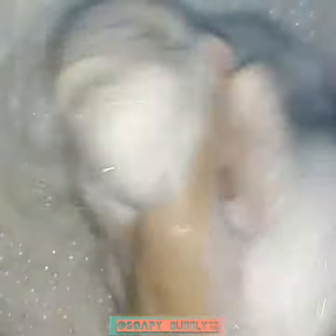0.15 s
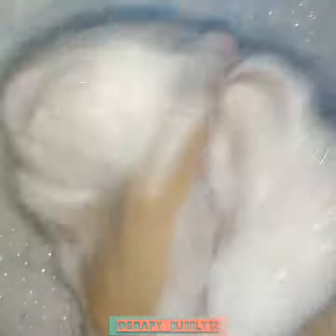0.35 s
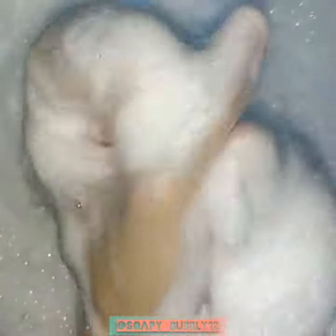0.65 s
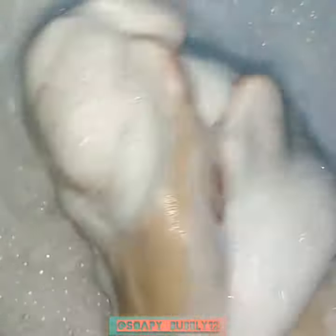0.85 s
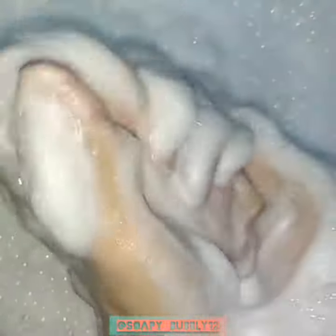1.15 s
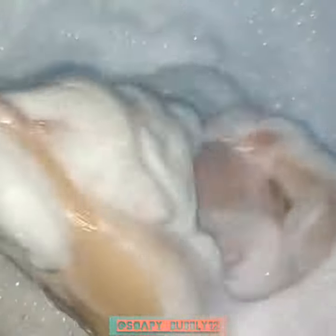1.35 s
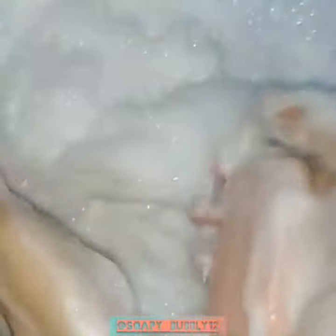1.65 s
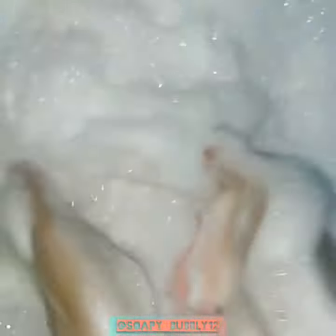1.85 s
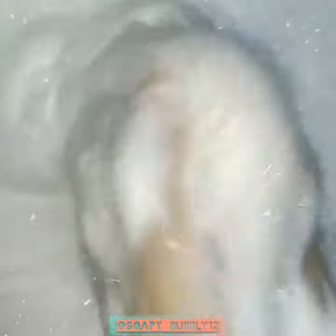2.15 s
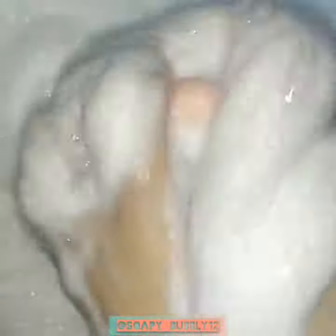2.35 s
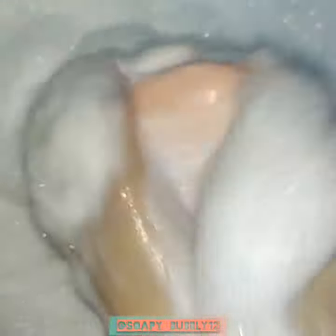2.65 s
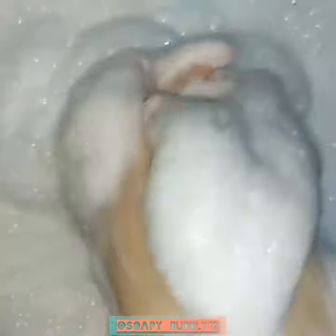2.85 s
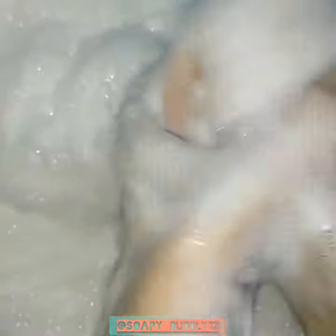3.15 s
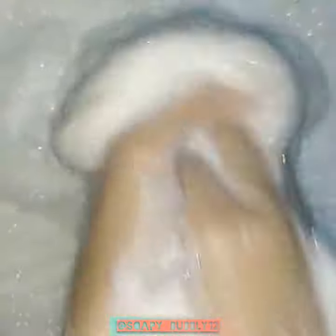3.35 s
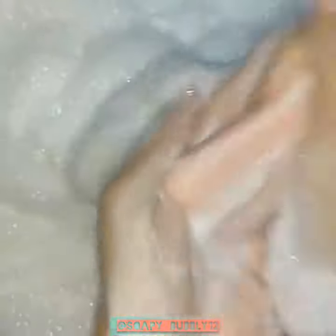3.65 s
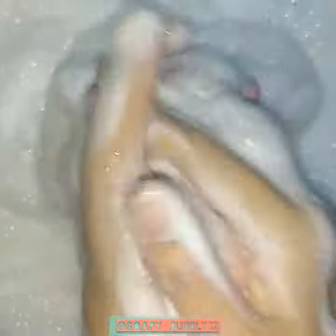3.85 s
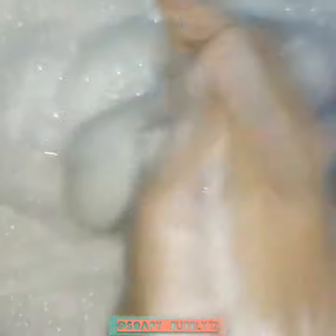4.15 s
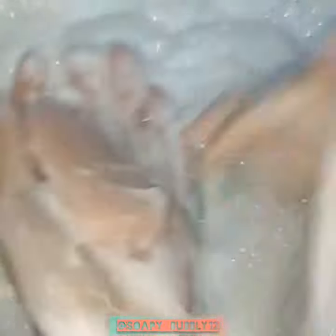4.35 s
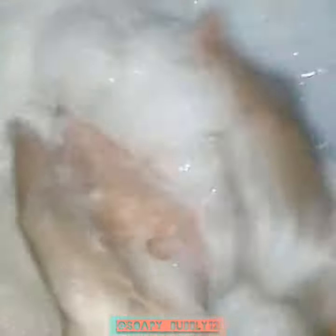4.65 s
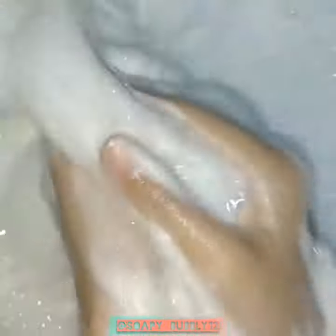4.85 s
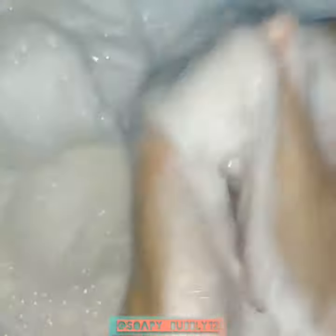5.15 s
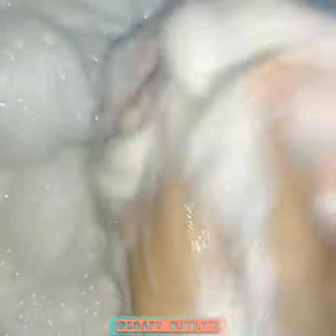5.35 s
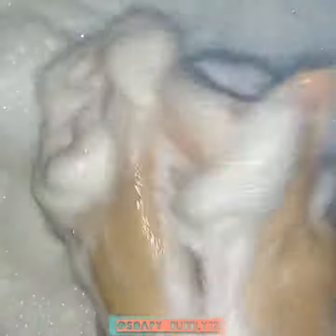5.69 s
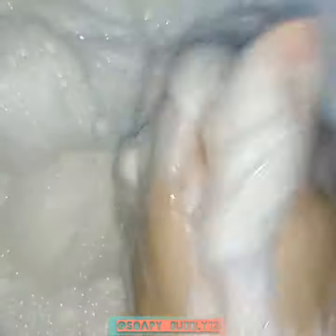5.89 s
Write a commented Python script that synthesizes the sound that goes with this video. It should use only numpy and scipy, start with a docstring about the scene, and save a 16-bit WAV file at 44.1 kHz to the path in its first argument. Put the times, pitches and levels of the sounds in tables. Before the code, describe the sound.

Close, wet squelching comes in uneven pulses as a soapy sponge is squeezed by hand, with air pockets popping and lather crackling and fizzing. It starts moderately, eases off, then returns stronger in the second half. Knuckles softly bump the basin a few times. The sound leans right, in a small room with a faint hum, and briefly cuts out here and there.

```python
"""Wet squelches and pops, close on the right: two hands knead a lathered sponge over a basin.
Air pockets ring as damped resonators, the smaller the higher, so large ones squelch and fine foam fizzes.
Soap films snap, crack and tear; knuckles excite the basin's modes; basin and walls add a short echo.
Behind it the foam hisses and the room hums low. The left microphone port hears the hands later and softer.
Each channel drops out at its own listed times, then recovers within 1 to 43 ms."""
import sys
import numpy as np
from scipy import signal
from scipy.io import wavfile

SR = 44100
rng = np.random.default_rng(int(sys.argv[2]) if len(sys.argv) > 2 else 0)


def to_wav(s):
    """Save 16-bit WAV."""
    ch = np.atleast_2d(s).T  # columns
    pcm = np.round(np.clip(ch, -1, 1) * 32767)  # PCM
    wavfile.write(sys.argv[1], SR, pcm.astype(np.int16))


N = 265482

# The hands' steady pressure. Each row: time in seconds, relative level in dB.
PRESSURE = [(0, -75), (.1, -88), (.25, -44), (.5, -71), (.75, -40.5), (1.05, -64), (1.2, -73), (1.4, -56),
            (1.75, -48.5), (2.2, -44), (2.55, -50), (3.0, -54.5), (3.3, -41), (3.8, -43), (4.2, -37.5),
            (4.45, -71), (4.8, -63), (5.1, -40.5), (5.3, -53), (6.02, -53)]
# Squeezes of the sponge. Each row: time of full strength and hold in seconds, then the levels
# of squelch, crackle and fizz in dB.
SQUEEZES = [(0.021, 0.0095, -36.5, -61, -50), (0.188, 0.061, -43.5, -55, -42.5),
            (0.321, 0.022, -40.5, -53.5, -70), (.412, .01, -60, -71, -58), (0.591, 0.0033, -36, -32, -56),
            (.63, 0.073, -51, -69, -69), (.918, 0.013, -60, -56, -46), (1.045, .03, -76, -77, -66),
            (1.11, 0.0088, -45, -61, -43.5), (1.247, 0.0048, -45.5, -68, -53),
            (1.362, 0.036, -46.5, -47.5, -46), (1.496, 0.056, -47, -44, -45), (1.549, 0.037, -45, -45, -37),
            (1.695, 0.047, -40, -49, -55), (1.771, 0.0074, -34, -44, -48), (1.922, 0.0097, -39, -54, -44),
            (1.992, 0.011, -39, -63, -43.5), (2.12, 0.056, -38, -50, -40.5),
            (2.29, 0.0056, -43.5, -48, -58), (2.359, 0.049, -38, -45, -58), (2.93, 0.018, -48, -55, -51),
            (3.082, 0.044, -55, -46, -41), (3.206, 0.014, -25.5, -27, -24.5),
            (3.427, 0.019, -30.5, -61, -36), (3.49, 0.022, -31.5, -47, -34),
            (3.612, 0.013, -51, -48.5, -43), (3.683, 0.011, -38, -37, -34), (3.72, 0.14, -43.5, -44, -39),
            (3.818, 0.035, -38, -38, -37), (4.076, 0.039, -42, -30, -26.5),
            (4.236, 0.021, -28, -35.5, -22.5), (4.517, 0.022, -40.5, -42, -44),
            (4.693, 0.004, -32, -36.5, -31), (5.089, 0.016, -55, -43, -44),
            (5.186, 0.03, -44, -40.5, -36.5), (5.341, 0.035, -48, -43.5, -45),
            (5.395, 0.047, -38.5, -44, -45.5), (5.562, 0.0069, -39, -44, -37),
            (5.726, 0.0052, -36.5, -45, -62), (5.843, 0.073, -45.5, -49.5, -54),
            (5.981, .04, -44, -47, -39)]
# Each list gives squelch, crackle, fizz.
GRIP_DB_PER_S = [1100, 1200, 1198]
RELEASE_DB_PER_S = [296, 283, 222]
STEADY_DB, PRESSURE_SHARE = [-54.5, -60.5, -50.5], [0.63, 0.84, 0.14]

def kneading():
    """Gains of squelch, crackle and fizz: steady pressure and exponential squeezes add in power."""
    t = np.arange(0, N + 64, 64) / SR
    pressure = np.interp(t, *np.transpose(PRESSURE))
    full, held, *peaks_db = np.transpose(SQUEEZES)
    since, gains = t - full[:, None], []
    for k, db in enumerate(peaks_db):
        release_db = RELEASE_DB_PER_S[k] * np.maximum(since - held[:, None], 0)
        loss_db = np.maximum(-GRIP_DB_PER_S[k] * since, release_db)
        steady = from_db(STEADY_DB[k] + PRESSURE_SHARE[k] * (pressure - pressure.mean()))
        gain = np.sqrt(steady ** 2 + np.sum(from_db(db[:, None] - loss_db) ** 2, axis=0))
        gains.append(np.interp(np.arange(N) / SR, t, gain))
    return gains

# Spectra of large, middling and fine bubbles. Each row: frequency in Hz, relative level in dB.
SQUELCH = [(230, -26.5), (290, 3), (370, 4.5), (490, -10.5), (620, -3.5), (800, 2.5), (1000, 0.5),
           (1200, -19.5)]
CRACKLE = [(1100, -15), (1500, 4), (2000, 1.5), (2600, 4), (3300, -5), (4300, -34)]
SQUEEZED_FIZZ = [(3000, -0.5), (4500, 0), (6500, -4), (9000, 4.5), (12000, 5), (15500, -4)]
HARD_SQUEEZE_DB, WET_HZ = -33, 6000   # water's muffling of the fizz is complete at this level

def lather():
    """Bubble resonance rises as size falls: large pockets squelch, middling ones crackle, fine fizz."""
    squelch_gain, crackle_gain, fizz_gain = kneading()
    squelch = bubbles(900, SQUELCH, cycles=5.0, spread_db=1.94, clump_db=4.5, patchy_db=2.0)
    crackle = bubbles(1200, CRACKLE, cycles=6.3, spread_db=1.42, clump_db=7.0, patchy_db=3.0)
    fizz = bubbles(6000, SQUEEZED_FIZZ, cycles=5.8, spread_db=1.2, clump_db=5.5, patchy_db=3.0)
    wet = np.minimum(fizz_gain / from_db(HARD_SQUEEZE_DB), 1)
    fizz = (1 - wet) * fizz + wet * butterworth(fizz, 1, WET_HZ)
    return (both_ports(squelch_gain * soften(squelch, top_hz=1470), left_db=-8.5, shadow_hz=3000)
            + both_ports(crackle_gain * crackle, left_db=-15.5, shadow_hz=3000)
            + both_ports(fizz_gain * fizz, left_db=-33, shadow_hz=9000))

def bubbles(per_s, spectrum, cycles, spread_db, clump_db, patchy_db, count=14):
    """Shot noise: clumped random impulses ring resonators that fall 60 dB in `cycles`; unit power."""
    sizes = from_db(spread_db * np.minimum(rng.exponential(1, N), 4)) * rng.choice([-1, 1], N)
    chance = rng.random(N)
    clumping = from_db(clump_db * (.7 * drift(15) + .7 * drift(90)))
    born = chance < per_s * clumping / SR
    resonator = rng.integers(0, count, N)
    out = 0
    for k, hz in enumerate(np.geomspace(spectrum[0][0], spectrum[-1][0], count)):
        patches = from_db(at_hz(spectrum, hz) + patchy_db * drift(14.8))
        out = out + hz * ring(patches * sizes * born * (resonator == k), hz, cycles / hz)
    return unit_power(out)

def bursts(rows, cycles, left_db, rise, spray_db, spray_cycles, spray_stretch, lead_s=0, size=2048):
    """Damped oscillation: each pocket rings with a noisy spray, its pitch climbing as it empties."""
    out, t = np.zeros((2, N + 2 * size)), np.arange(size) / SR
    for (start, db, hz), noise in zip(rows, rng.standard_normal((len(rows), size + 2))):
        ring_cycles = cycles * np.exp(.25 * noise[-1])   # uneven from burst to burst
        turns = hz * t
        swell = np.minimum(turns / 0.47, 1)   # the wall opens within the first cycle
        tone = np.sin(2 * np.pi * turns * (1 + rise * turns)) * from_db(-60 * turns / ring_cycles)
        spray = unit_power(ring(noise[:size], hz, spray_cycles / hz))
        spray *= from_db(spray_db - 60 * turns / (spray_stretch * ring_cycles))
        sound = from_db(db) * soften(swell * (tone + spray), top_hz=min(3.6 * hz, 18000))
        deep_db = -7 * max(np.log2(700 / hz), 0)   # deep pockets are fainter on the left
        at = round((start - lead_s) * SR)
        left_at = at + LEFT_LAG_SAMPLES
        out[1, at:at + size] += sound
        out[0, left_at:left_at + size] += from_db(left_db + deep_db + 0.47 * noise[-2]) * sound
    return out[:, :N]

# Air pockets bursting in the sponge. Each row: time in seconds, level in dB, pitch in Hz.
POPS = [(.2103, -26.5, 500), (.2959, -20.5, 730), (.3161, -20.5, 430), (.4098, -10, 633), (.4385, -21, 432),
        (.5976, -17.5, 430), (.616, -20, 700), (.6256, -9, 602), (1.0862, -30, 1020), (1.122, -38, 760),
        (1.3202, -23.5, 700), (1.4921, -15, 870), (1.6938, -21, 865), (1.7083, -18, 804),
        (1.7414, -23, 1010), (1.7738, -24.5, 820), (1.9218, -12, 433), (1.9937, -19.5, 1020),
        (2.0669, -24.5, 447), (2.1062, -23, 660), (2.1368, -21.5, 410), (2.2952, -23.5, 680),
        (2.3605, -25, 470), (2.3763, -20, 626), (2.549, -34, 680), (2.6149, -39, 705), (2.6976, -27, 395),
        (3.1028, -31, 756), (3.2045, -13, 440), (3.2085, -16, 500), (3.2125, -11.5, 500),
        (3.2165, -12, 533), (3.2224, -7.5, 443), (3.2325, -28, 520), (3.2395, -21, 580), (3.2487, -12, 426),
        (3.2545, -18, 610), (3.2608, -16, 585), (3.2705, -17, 634), (3.3227, -14.5, 647),
        (3.3944, -10, 734), (3.4133, -17, 734), (3.43, -16, 1150), (3.4385, -14, 1250), (3.463, -19, 760),
        (3.47, -21, 700), (.64, -26, 660), (.655, -28, 650), (3.428, -4.5, 560), (3.4321, -16, 406),
        (3.4348, -7, 360), (3.4375, -8, 434), (3.44, -3.5, 780), (3.449, -7, 750), (3.4565, -15, 414),
        (3.4815, -22, 500), (3.5027, -6, 830), (3.6312, -14.5, 1270), (3.673, -20.5, 700),
        (3.8695, -13, 493), (3.9218, -16, 640), (4.0121, -22.5, 820), (4.0685, -24.5, 700),
        (4.0775, -24.5, 624), (4.0904, -19.5, 620), (4.129, -16, 680), (4.143, -23, 700), (4.162, -25, 680),
        (4.208, -38, 620), (4.2399, -10.5, 500), (4.2447, -10.5, 613), (4.2562, -12.5, 442),
        (4.2635, -11, 1000), (4.5195, -29, 690), (4.5482, -22, 760), (4.7033, -26, 965),
        (4.7794, -24.5, 780), (4.7965, -24.5, 540), (4.841, -27, 790), (4.8636, -9, 910),
        (4.9856, -26, 610), (5.1922, -28, 910), (5.2221, -19, 910), (5.2225, -21.5, 380),
        (5.3656, -20.5, 644), (5.4007, -20.5, 760), (5.402, -24, 393), (5.435, -18, 1040),
        (5.4355, -22.5, 388), (5.456, -34, 750), (5.5474, -17.5, 1080), (5.5873, -17.5, 670),
        (5.6931, -23.5, 775), (5.633, -28, 724), (5.7285, -23, 420), (5.8393, -20, 480), (5.857, -26, 700),
        (5.866, -28, 520), (5.888, -26, 750), (5.898, -29, 760), (5.9455, -27, 727), (4.96, -32, 800),
        (3.845, -21, 400), (3.74, -25, 500), (5.982, -22.5, 413)]

def pops():
    """Free vibration of bursting air pockets, each starting to open just before its first crest."""
    return bursts(POPS, cycles=6.2, left_db=-8, rise=0.0015,
                  spray_db=-9.0, spray_cycles=6.4, spray_stretch=1.11, lead_s=0.00074)

# Air modes between the palms. Each row: frequency in Hz, coupling in dB, 60 dB decay time in seconds.
PALM_MODES = [(354, -19.5, 0.036), (700, -30, 0.016), (830, -10, 0.007)]

def cupped_palms(x):
    """Cavity resonance: the air between the palms rings on after each pop."""
    return x + sum(from_db(db) * 2 * np.pi * hz / SR * ring(x, hz, t60) for hz, db, t60 in PALM_MODES)

# Round bubbles. Each row: start in seconds, level in dB, pitch in Hz.
PLOPS = [(3.0545, -22, 800), (3.075, -31, 830), (4.108, -21, 670)]

def plops(swell_cycles=3.5, fade_cycles=2.5, size=2048):
    """Amplitude modulation: a bubble's one clear pitch swells, flutters and fades."""
    out = np.zeros(N + size)
    for (start, db, hz), noise in zip(PLOPS, rng.standard_normal((len(PLOPS), size))):
        turns, at = hz * np.arange(size) / SR, round(start * SR)
        envelope = np.exp(-((turns - swell_cycles) / fade_cycles) ** 2)
        flutter = 1 + .45 * unit_power(soften(noise, top_hz=hz / 2))
        out[at:at + size] += from_db(db) * envelope * flutter * np.sin(2 * np.pi * turns)
    return both_ports(out[:N], left_db=-9.5, shadow_hz=3000)

# Soap films snapping. Each row: start in seconds, level in dB, pitch in Hz.
SNAPS = [(0.0359, -13, 2140), (0.1882, -12, 3000), (.1899, -10, 6000), (0.3305, -20, 2100),
         (.358, -18, 2290), (0.6253, -30, 2260), (0.806, -22.5, 2300), (0.9109, -15, 5500),
         (0.9207, -26, 2400), (1.0412, -23, 10450), (1.066, -26, 8000), (1.0863, -25.5, 1760),
         (1.1216, -21, 1960), (1.4919, -27, 5000), (1.5844, -26, 2190), (1.6924, -20.5, 2730),
         (1.7867, -23, 1470), (1.9937, -17, 2270), (2.1567, -17, 2530), (2.6109, -27, 10800),
         (2.8748, -14, 2370), (3.0835, -21.5, 2180), (3.2093, -5, 1970), (3.2245, -17, 1990),
         (3.2131, -22, 3080), (3.4485, -10, 2670), (3.4892, -24, 2340), (3.5024, -3, 2730),
         (3.5192, -10, 4770), (3.6308, -19, 2400), (3.6725, -19, 2200), (3.6828, -15, 2100),
         (3.6925, -18, 3500), (3.696, -17, 2200), (3.724, -20, 2500), (3.7318, -17, 1900),
         (3.7572, -20, 1840), (3.7757, -20, 1600), (3.807, -22, 5000), (3.8775, -21, 2000),
         (3.9069, -21, 1900), (4.0287, -26, 2370), (4.0441, -23, 2110), (4.936, -24, 3300),
         (5.3377, -21, 2400), (5.3572, -23, 2480), (5.4041, -22, 2070), (5.5153, -24, 2000),
         (5.667, -28, 2200), (5.7505, -22, 2200), (6.0037, -14, 2340), (3.7819, -16, 3080),
         (3.822, -19, 2500), (3.8445, -21, 2520), (3.8688, -6.5, 2350), (3.9214, -13, 2600),
         (4.0608, -13, 6000), (4.0765, -20, 2110), (4.0957, -9, 4000), (4.2393, -1.5, 2230),
         (4.2578, -33, 2150), (4.3111, -0.5, 3240), (4.678, -19.5, 2640), (4.702, -14, 2600),
         (4.8397, -22, 2700), (4.8635, -38, 2240), (4.9366, -16, 11500), (5.091, -26, 1840),
         (5.1854, -24, 3000), (5.192, -19, 1980), (5.2215, -11, 2340), (5.3381, -10.5, 11090),
         (5.4361, -21, 1980), (5.5734, -23, 2400), (5.5866, -14.5, 2720), (5.729, -4, 2540),
         (5.7385, -17.5, 3060), (5.8438, -20.5, 2330), (5.9108, -22, 3130), (5.982, -11.5, 2710)]

def snaps():
    """Rupture sets off a brief high ring, dulled on the left by the hands' acoustic shadow."""
    left, right = bursts(SNAPS, cycles=5.5, left_db=-9, rise=0.0019,
                         spray_db=-16.0, spray_cycles=3.8, spray_stretch=5.7)
    return np.array([soften(left, top_hz=3200), right])

# Large films cracking. Each row: start in seconds, peak in dB, lower and upper band edges in Hz.
CRACKS = [(.5545, -27, 6000, 15000), (1.2536, -20, 2500, 15500), (1.5248, -8, 8000, 13500),
          (1.9437, -24, 2800, 10000), (2.4645, -25, 1500, 12000), (3.034, -28, 7000, 15500),
          (3.051, -17, 4500, 15000), (3.0835, -23, 2000, 13000), (3.0908, -14, 1800, 12000),
          (3.172, -23, 2000, 12500), (3.2241, -10, 5000, 13500), (3.4485, -18, 7500, 12500),
          (3.4893, -4, 2000, 12000), (3.7162, -15, 3500, 13000), (3.7576, -11, 4000, 15500),
          (4.2465, -14, 6000, 13000)]

def cracks(spray_db=-16.5, spray_s=0.00072, size=512):
    """An impulse is broadband: one click and a brief spray of droplets fill each film's band."""
    out, t = np.zeros(N + size), np.arange(size) / SR
    for (start, db, low_hz, high_hz), noise in zip(CRACKS, rng.standard_normal((len(CRACKS), size))):
        burst = (t == 0) + from_db(spray_db) * noise * np.exp(-t / spray_s)
        click = butterworth(burst, 2, [low_hz, high_hz], "band")
        at = round(start * SR)
        out[at:at + size] += from_db(db) * click / np.abs(click).max()
    return both_ports(out[:N], left_db=-15, shadow_hz=6000)

# Films tearing slowly. Each row: start in seconds, relative level in dB, pitch in Hz, length in seconds.
TEARS = [(0.592, -22.5, 4770, 0.0032), (0.699, -26, 4000, 0.0079), (0.917, -34.5, 8000, 0.011),
         (0.931, -31, 9000, 0.0066), (1.521, -27, 9600, 0.0079), (1.562, -21, 4240, 0.005),
         (1.579, -31, 7000, 0.0045), (2.377, -28.5, 3800, 0.009), (2.803, -37.5, 9600, 0.017),
         (3.225, -21, 9000, 0.01), (3.484, -20.5, 7000, 0.006), (3.611, -26.5, 7100, 0.0054),
         (3.729, -23, 7700, 0.0073), (3.907, -27, 7900, 0.0071), (4.094, -26, 5000, 0.007),
         (4.247, -33, 8800, 0.0065), (4.31, -25, 4000, 0.0071), (5.335, -33, 9100, 0.0038),
         (5.515, -30.5, 4600, 0.0079), (6.002, -21, 9610, 0.0055)]

def tears(ticks_per_s=7000, size=1024):
    """A random impulse train: uneven ticks rattle and fade as a film runs open."""
    out, t = np.zeros(N + size), np.arange(size) / SR
    for (start, db, hz, length), (chance, noise) in zip(TEARS, rng.random((len(TEARS), 2, size))):
        ticks = (chance < ticks_per_s / SR) * (2 * noise - 1)
        envelope = np.minimum(t / 0.00085, 1) * from_db(-9.0 * (t / length) ** 2)
        at = round(start * SR)
        out[at:at + size] += from_db(db - 4.5) * envelope * unit_power(ring(ticks, hz, 2.0 / hz))
    return both_ports(out[:N], left_db=-23, shadow_hz=4000)

# Knuckles against the basin. Each row: start in seconds, relative level in dB.
KNOCKS = [(1.821, -24.5), (1.872, -27), (1.922, -9.5), (2.006, -14.5), (4.2556, -21.5)]
# The basin's modes. Each row: frequency in Hz, relative level in dB, 60 dB decay time in seconds.
BASIN_MODES = [(112.4, -11.5, 0.42), (152, 3.5, 0.049), (200.3, -4.5, 0.18), (339, -7, 0.11)]

def basin():
    """Modal vibration: a soft blow excites every mode of the basin with a strength of its own."""
    at, out = [round(start * SR) for start, _ in KNOCKS], np.zeros(N)
    for hz, mode_db, t60 in BASIN_MODES:
        blows = np.zeros(N)
        blows[at] = from_db(np.array(KNOCKS)[:, 1] + mode_db + rng.normal(0, 1.54, len(at)))
        out += ring(blows, hz, t60)
    return from_db(-7.5) * soften(both_ports(out, left_db=-8.5, shadow_hz=3000), top_hz=500)

def echoes(x, t60_s, build_s, dull_hz, size=16384):
    """Reverberation: dense reflections off basin and walls build and decay, different at each port."""
    t = np.arange(size) / SR
    envelope = np.minimum(t / build_s, 1) * from_db(-60 * t / t60_s)
    tails = butterworth(rng.standard_normal((2, size)), 1, dull_hz) * envelope
    tails = butterworth(tails, 1, 550, "high")   # foam in the basin returns little bass
    tails /= np.sqrt(np.sum(tails ** 2, axis=1, keepdims=True))
    return from_db([[-11.5], [-16.5]]) * signal.fftconvolve(x[None], tails, axes=1)[:, :N]

# Spectrum of the foam lying in the basin. Each row: frequency in Hz, relative level in dB.
FOAM = [(3000, 23), (4500, -1), (6500, -25), (9000, -7), (12000, 13), (15500, -19)]

def settling_foam():
    """Superposition: countless tiny bursts merge into a hiss, nearer the left port."""
    hiss = bubbles(20000, FOAM, cycles=1.6, spread_db=0.6, clump_db=4.5, patchy_db=4.5)
    return from_db([[-52], [-62]]) * hiss

# The room's low resonances. Each row: frequency in Hz, bandwidth in Hz, level in dB.
HUM = [(94.2, 15.2, -49.5), (206, 26, -55.5)]

def hum(left_lag_s=0.00324):
    """Narrowband noise wavers: two resonances hum, partly shared by the ports."""
    out = 0
    for hz, width_hz, db in HUM:
        shared, left, right = ring(rng.standard_normal((3, N)), hz, np.log(1000) / np.pi / width_hz)
        delayed = np.roll(shared, round(left_lag_s * SR))
        out = out + from_db(db) * unit_power(np.array([delayed + 1.18 * left, shared + 1.01 * right]))
    return out

# Spectrum of the room's noise. Each row: frequency in Hz, relative level per Hz in dB.
ROOM = [(18, -49), (30, -4), (71, 3), (100, 10), (273, -10), (526, -4.5), (616, -7), (1540, -13),
        (2290, -15), (6380, -27.5), (11100, -18), (14800, -13.5), (16000, -33)]
# Likeness of that noise at the two ports. Each row: frequency in Hz, correlation from 0 to 1.
ROOM_COHERENCE = [(60, 1), (300, 1), (1000, 0.077), (16000, .02)]

def room_noise(flicker_db=3.0):
    """Partial coherence: flickering half-octave bands, alike at both ports only in the bass."""
    out, edges = 0, 30 * 2 ** np.arange(0, 9.3, .5)
    white = rng.standard_normal((2, 2, N))
    for k, (low, high) in enumerate(zip(edges, edges[1:])):
        mid, side = butterworth(white[k % 2], 2, [low, high], "band")
        hz = np.sqrt(low * high)
        alike = at_hz(ROOM_COHERENCE, hz)
        gain = from_db(at_hz(ROOM, hz) + flicker_db * drift(21.0))
        out = out + gain * (np.sqrt(1 + alike) * mid + np.sqrt(1 - alike) * side * [[1], [-1]])
    return from_db([[-49], [-46]]) * unit_power(out)

LEFT_LAG_SAMPLES = 18

def both_ports(x, left_db, shadow_hz):
    """Path difference and shadowing: the left port hears the hands later, softer and dulled."""
    dull = butterworth(x, 1, shadow_hz)
    return np.array([from_db(left_db) * np.roll(dull, LEFT_LAG_SAMPLES), x])

def ring(clicks, hz, t60):
    """Damped resonator: a unit click starts a tone of height 1, with no net push."""
    r, w = from_db(-60 / (t60 * SR)), 2 * np.pi * hz / SR
    return signal.lfilter([.5, 0, -.5], [1, -2 * r * np.cos(w), r * r], clicks + 1e-18)

def soften(x, top_hz):
    """Absorption of treble, as by wet foam around a source."""
    return butterworth(x, 3, top_hz)

def butterworth(x, order, hz, kind="low"):
    """Filter with a maximally flat passband."""
    return signal.sosfilt(signal.butter(order, hz, kind, fs=SR, output="sos"), x)

def drift(hz):
    """Low-passed noise: a slow random wander of unit power."""
    r = np.exp(-80 * np.pi * hz / SR)   # one step per 40 samples
    slow = signal.lfilter([1], [1, -2 * r, r * r], rng.standard_normal(N // 40 + 2002))[2000:]
    return np.interp(np.arange(N) / 40, np.arange(len(slow)), unit_power(slow))

def at_hz(points, hz):
    """Interpolation of a spectrum on log frequency."""
    frequencies, values = np.transpose(points)
    return np.interp(np.log(hz), np.log(frequencies), values)

def from_db(db):
    """Amplitude ratio of a level."""
    return 10 ** (np.asarray(db) / 20)

def unit_power(x):
    """Normalisation to a mean square of 1."""
    return x / np.sqrt(np.mean(x ** 2) + 1e-20)

def scene():
    """Superposition of the hands' direct sound, its reflections and the background."""
    background = room_noise() + hum() + settling_foam()
    popping, snapping = pops(), snaps()
    hands = lather() + cupped_palms(popping) + plops() + snapping + cracks() + tears() + basin()
    return hands + echoes(hands[1], t60_s=0.3, build_s=0.0011, dull_hz=11200) + background

# Dropouts of one channel. Each row: the two ends of the dip's floor in seconds, depth in dB,
# recovery time in seconds, channel (0 left, 1 right).
DROPOUTS = [(0.142, 0.183, -57, .003, 0), (0.53, .562, -20, .026, 0), (0.746, 0.78, -29, 0.025, 0),
            (0.848, 0.906, -35, .003, 0), (1.01, 1.059, -50, 0.04, 0), (1.161, 1.254, -39, 0.043, 0),
            (1.351, 1.375, -30, 0.023, 0), (1.462, 1.487, -33, 0.0023, 0), (1.652, 1.683, -26, 0.0064, 0),
            (1.752, 1.778, -18, 0.0033, 0), (1.84, 1.868, -11, .003, 0), (2.252, 2.284, -21, 0.0066, 0),
            (2.476, 3.044, -37, 0.009, 0), (2.566, 2.594, -25, .004, 0), (3.146, 3.181, -33, 0.017, 0),
            (3.81, 3.823, -12, .003, 0), (4.059, 4.072, -23, 0.0027, 0), (4.24, 4.231, -18, .003, 0),
            (4.431, 4.458, -20, 0.032, 0), (4.663, 4.674, -24, 0.014, 0), (4.96, 5.009, -37, 0.032, 0),
            (5.046, 5.099, -8, .006, 0), (5.137, 5.215, -33.5, 0.0045, 0), (5.519, 5.534, -16, .003, 0),
            (5.668, 5.7, -22, .023, 0), (5.82, 5.835, -14, .005, 0), (5.905, 5.941, -13, 0.0073, 0),
            (5.965, 5.974, -14, .003, 0), (0.145, 0.183, -40, 0.003, 1), (5.176, 5.183, -14, .001, 1),
            (0.539, 0.545, -26, .003, 1), (0.899, 0.908, -30, .0025, 1), (1.014, 1.038, -22, 0.003, 1),
            (1.477, 1.4895, -28, 0.0015, 1), (1.236, 1.2405, -28, 0.012, 1),
            (2.526, 2.546, -12.5, 0.0023, 1), (2.572, 2.605, -36, 0.004, 1),
            (2.641, 2.676, -13.5, 0.0024, 1), (2.779, 2.79, -21, 0.0032, 1), (2.965, 2.994, -18, 0.01, 1),
            (4.459, 4.476, -20, .003, 1), (4.663, 4.674, -29, 0.003, 1)]
FADE_DB_PER_S = [882, 1917]   # left, right

def record(dry):
    """Band limiting and gain dips: deep bass and top are cut; each channel drops out at set times."""
    t, level_db = np.arange(N) / SR, np.zeros((2, N))
    for lowest, returns, depth_db, recovery_s, side in DROPOUTS:
        fade_s = abs(depth_db) / FADE_DB_PER_S[side]
        edges = np.sort([lowest - fade_s, lowest, returns, returns + recovery_s])
        level_db[side] += np.interp(t, edges, [0, depth_db, depth_db, 0])
    heard = butterworth(dry, 2, 70, "high") * from_db(level_db)
    return signal.sosfilt(signal.cheby2(14, 70, 16400, fs=SR, output="sos"), heard)

dry = scene()
out = record(dry)
to_wav(out)
```